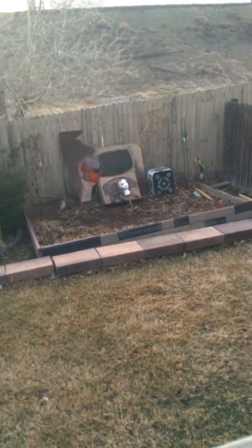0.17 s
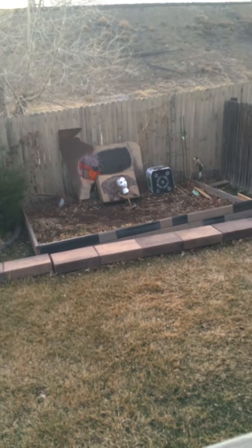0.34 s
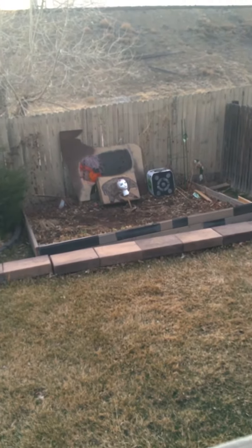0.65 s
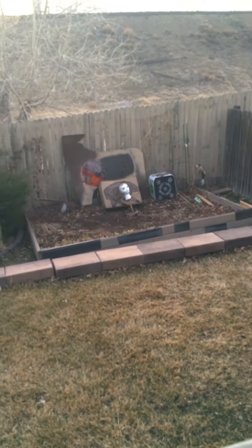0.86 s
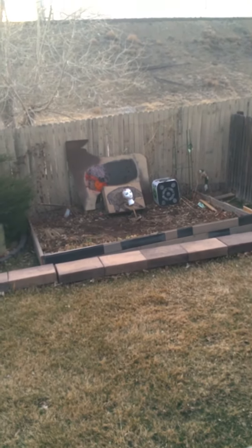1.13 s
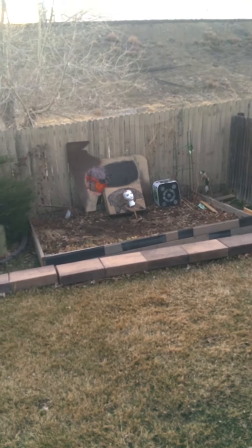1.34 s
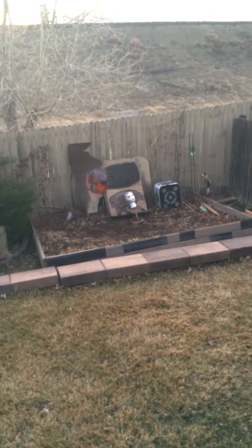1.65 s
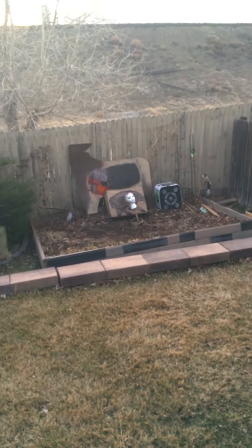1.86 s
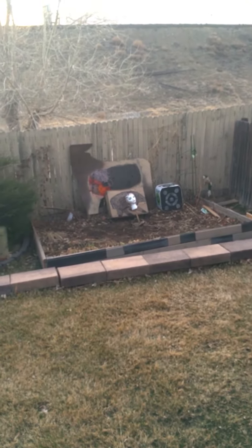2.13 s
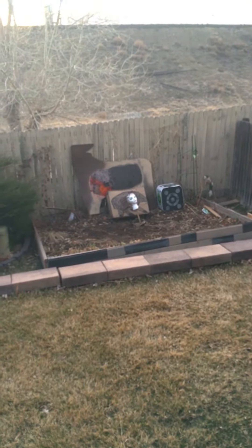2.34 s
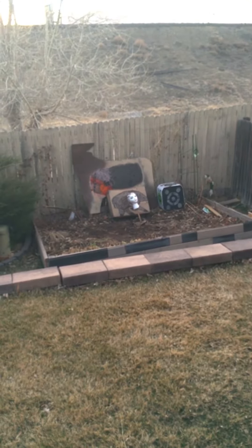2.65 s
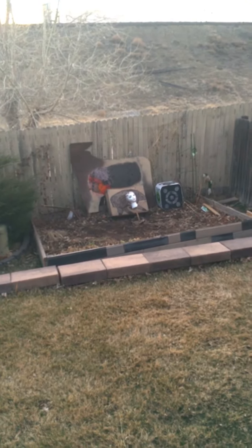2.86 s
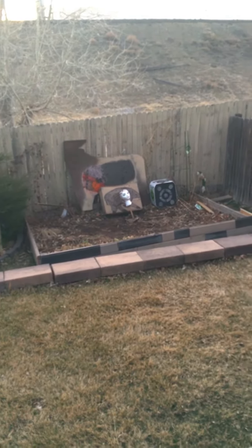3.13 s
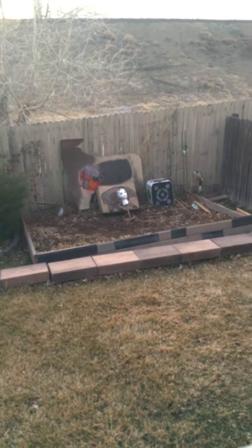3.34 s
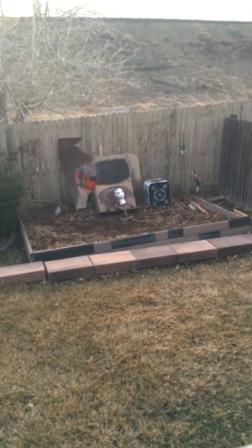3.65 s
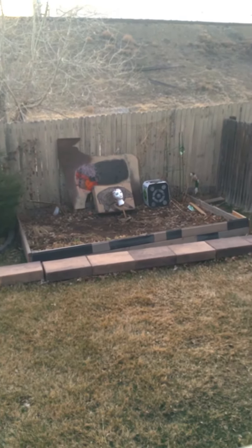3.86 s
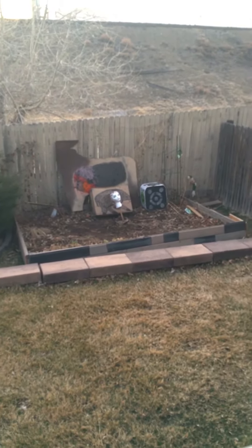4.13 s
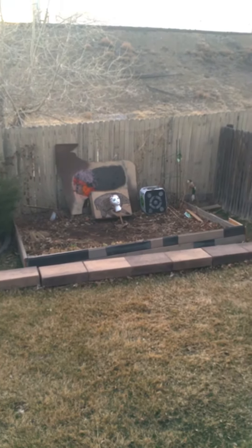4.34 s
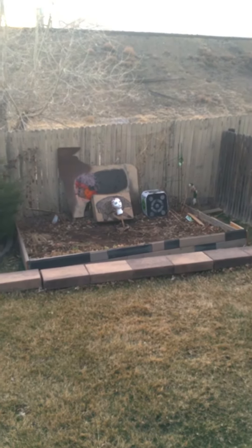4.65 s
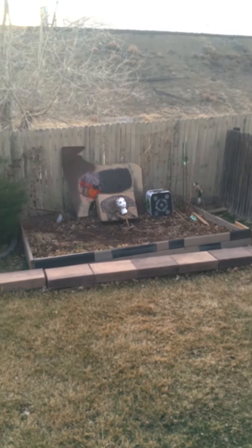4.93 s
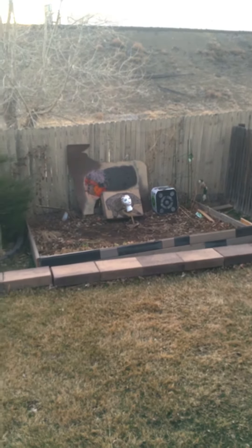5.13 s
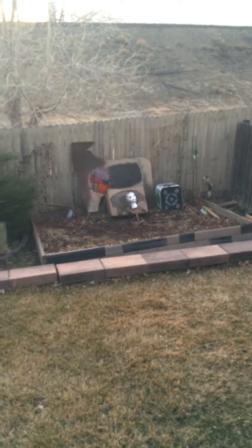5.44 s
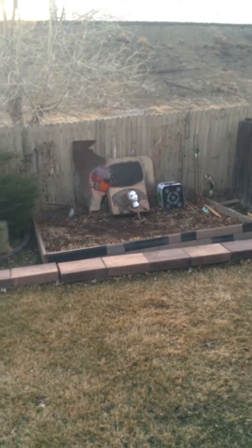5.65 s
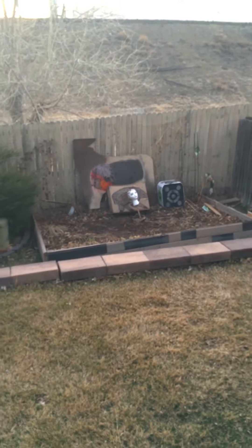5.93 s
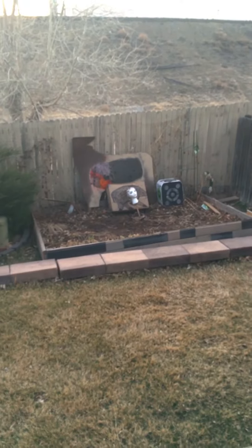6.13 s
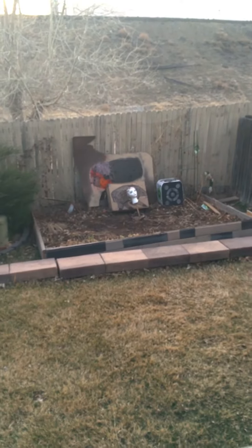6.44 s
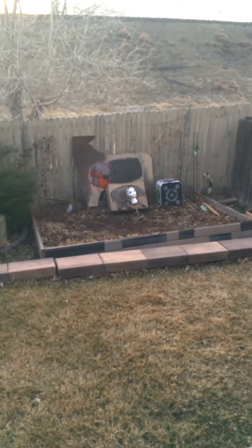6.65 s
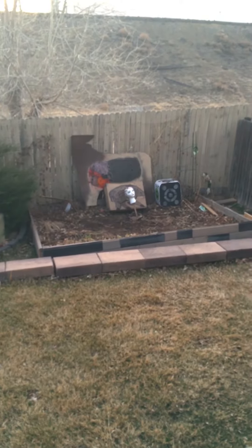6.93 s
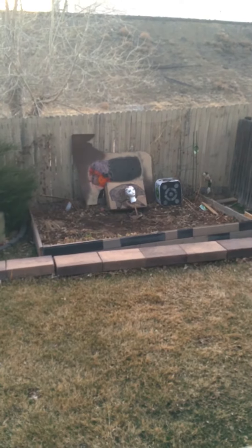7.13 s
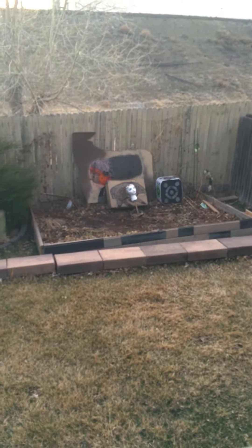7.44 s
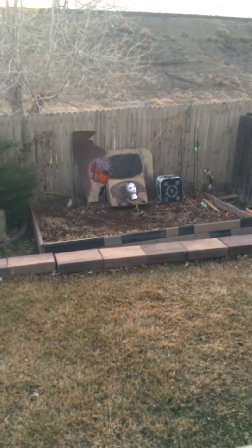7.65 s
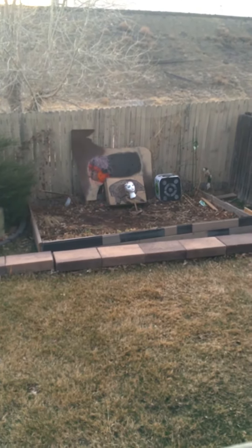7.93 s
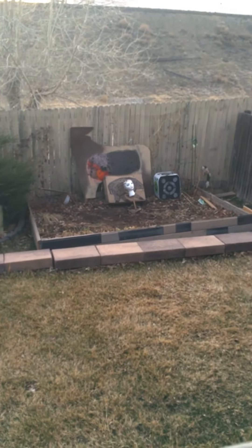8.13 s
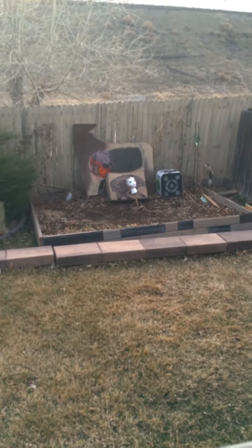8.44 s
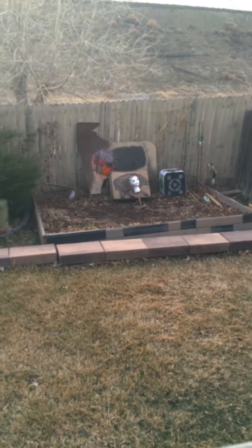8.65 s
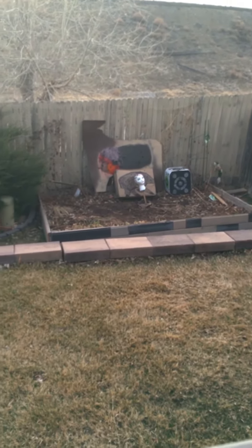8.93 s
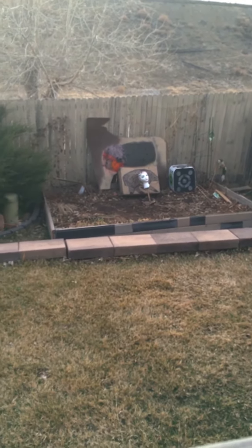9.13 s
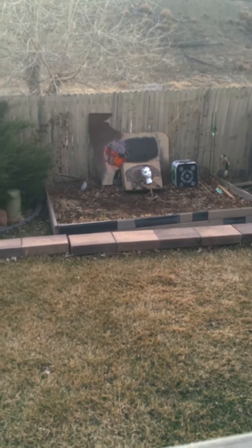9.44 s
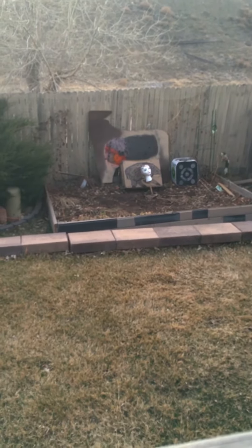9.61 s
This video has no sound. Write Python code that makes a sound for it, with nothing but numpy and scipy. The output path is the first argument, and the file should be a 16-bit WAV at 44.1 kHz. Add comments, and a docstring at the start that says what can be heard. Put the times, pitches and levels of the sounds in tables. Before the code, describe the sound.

Over low town hum, a bow twangs and its arrow cracks into a target; later, faint gear clicks and a far vehicle accelerating.

```python
"""A low town hum builds behind a back yard; then a bow snaps, its arrow hisses off and thuds into a target by a fence.
A hillside echoes the hit; afterwards a distant vehicle pulls through three gears while the archer's gear clicks.
Bow and target are struck modes with noise bursts; whistle, vanes and scrapes are narrow noise bands.
The exhaust is a sum of wavering orders; town, cloth and microphone hiss are coloured noise.
One microphone hears it all; the recorder's hiss gate holds the treble down until a loud, bright sound opens it."""
import sys
import numpy as np
from scipy import signal
from scipy.fft import rfft, irfft, next_fast_len
from scipy.io import wavfile
from scipy.ndimage import uniform_filter1d, map_coordinates

SR = 44100
rng = np.random.default_rng(int(sys.argv[2]) if len(sys.argv) > 2 else 0)


def dump_mix(stems):
    """Bounce the given channels to the path in sys.argv[1] as a 16-bit WAV at rate SR."""
    frames = np.atleast_2d(stems).T  # one column per channel
    limited = np.clip(frames, -1, 1)  # hard clip at full scale
    pcm = np.round(limited * 32767).astype(np.int16)
    wavfile.write(sys.argv[1], SR, pcm)


N = 431298  # length [samples]

# Far town rumble: (frequency [Hz], relative level per hertz [dB])
RUMBLE_SPECTRUM = [(20, -25.5), (32, -16.5), (45, -3.5), (62, 2), (85, -0.5), (130, -4), (200, -7.5),
                   (320, -8.5), (430, -22), (700, -31.5), (1500, -61.5)]
# Far tyre wash: (frequency [Hz], relative level per hertz [dB])
TYRE_SPECTRUM = [(150, -9), (400, 0), (650, -0.5), (900, 1.5), (1150, -6), (1500, -13.5), (2200, -20),
                 (4000, -30), (9000, -47)]
# Rise and fall of the tyre wash, before its common lift: (time [s], relative level [dB])
TYRE_LEVEL = [(0.0, -60), (3.46, -61), (5.34, -59.5), (5.58, -60), (6.29, -56.5), (7.11, -60), (7.65, -57),
              (9.78, -61)]
# Microphone hiss: (frequency [Hz], relative level per hertz [dB])
HISS_SPECTRUM = [(300, -10.5), (1500, 1.5), (3500, 3), (4900, -0.5), (6000, 0.5), (9500, -3), (10400, -7),
                 (11500, -4.5), (15500, -7.5)]
# Distant engine, one row a gear: (pull start [s], pull end [s], start rate [cycles/s], end rate [cycles/s])
GEAR_PULLS = [(2.4, 3.53, 24, 36.7), (3.75, 5.42, 24.8, 34.1), (5.68, 7.42, 26.3, 32.6)]
# Throttle in each gear: (level at the start [dB], time of the peak [s], level at the peak [dB])
THROTTLE = [(-45, 3.09, -41), (-45, 5.36, -38.5), (-44.5, 7.02, -36.5)]
# Uneven beat of the cylinders: (multiple of the cycle rate, relative level in first, second, third gear [dB])
EXHAUST_ORDERS = [(2, 13.5, 5.5, 8.5), (3, -3.5, -8.5, -2.5), (4, -5.5, -2, -1), (5, -1, -3.5, -7.5),
                  (6, -1.5, -2, -7), (7, 5.5, 1.5, -4.5), (8, -11, -12.5, -15.5), (9, 1, -1.5, -.5),
                  (10, -6.5, -8.5, -8.5), (11, -3, -2, -1), (12, -5, -4.5, -3.5), (13, -10, -11, -7),
                  (14, -7, -8.5, -6.5), (15, -13, -22, -18), (16, -7.5, -14, -11), (17, -26.5, -27.5, -24),
                  (18, -15.5, -17, -16.5), (19, -15.5, -16.5, -16), (21, -17.5, -16, -18),
                  (23, -21, -15.5, -20), (25, -24, -13.5, -17), (27, -22, -15.5, -16), (28, -23, -19, -16),
                  (30, -24, -14.5, -16.5), (32, -25, -18, -19), (34, -28, -21, -22)]
# Fixed colour laid on the exhaust orders, with peaks and dips: (frequency [Hz], gain [dB])
ENGINE_COLOUR = [(50, -9.5), (120, 3.0), (160, -1.0), (185, -1.0), (210, 1.0), (235, 5.0), (260, 0.5),
                 (285, 3.5), (310, 3.5), (335, -1.5), (365, 3.5), (395, -4.0), (430, -3.0), (480, -1.5),
                 (530, 2.5), (590, 5.0), (640, -10.0), (800, -2.0), (950, -4.5), (1150, -2.5)]
# Gas roar of the exhaust: (frequency [Hz], relative level per hertz [dB])
ROAR_SPECTRUM = [(40, -24), (110, -6.5), (250, 3.5), (370, 4), (460, -15), (570, 5.5), (680, -21.5),
                 (900, -9.5), (1200, -19.5), (2000, -32), (4000, -56)]
# Sleeve passes, before a common lift: (time of the peak [s], half-length [s], relative level [dB], treble shelf [dB])
SLEEVE_PASSES = [(3.434, 0.064, -73.5, 7.5), (4.961, 0.07, -70.5, 6), (5.147, 0.15, -73.5, -4.5),
                 (5.501, 0.15, -71, -2), (5.798, 0.18, -70.5, -5), (7.828, 0.074, -72.5, 11),
                 (8.367, 0.16, -70, -0.5), (8.6, 0.13, -75, -1), (8.802, 0.25, -76, -4)]
# Rubbing cloth: (frequency [Hz], relative level per hertz [dB])
CLOTH_SPECTRUM = [(600, -10), (1500, 1.5), (2400, 2.5), (3400, -0.5), (4600, -3.5), (6000, -3),
                  (9000, -9.5), (11000, -14.5), (16000, -31)]
# Gear scrapes, before a common lift: (time of the peak [s], half-length [s], relative level [dB], centre [Hz])
SCRAPE_EVENTS = [(5.048, .016, -64, 3350), (5.1, 0.0088, -63, 3200), (5.131, 0.0072, -57, 1370),
                 (5.18, 0.011, -60.5, 1370), (5.185, .02, -68, 3240), (5.195, .025, -69, 4070),
                 (5.23, .007, -67, 3090), (5.467, 0.016, -61.5, 3500), (5.475, .025, -67, 4150)]
# Small gear clicks: (time [s], snap level [dB], treble shelf [dB], tail t60 [s], ring centre [Hz], ring level [dB])
CLICK_EVENTS = [(2.529, -53, 17, 0.32, 4200, -53), (2.569, -56, 14, 0.12, 4230, -54),
                (3.896, -49.5, -7, 0.12, 1570, -51), (4.388, -49.5, 1, 0.14, 2050, -52),
                (4.412, -52, -2, 0.19, 2210, -52), (4.755, -49.5, 11, 0.04, 3870, -46.5),
                (5.124, -51, -2, .11, 3080, -52), (5.167, -55, 15, .14, 3300, -57),
                (5.372, -59, -4, .04, 3260, -52), (5.38, -48.5, -4, 0.089, 3000, -47),
                (5.448, -60, 22, 0.19, 4750, -60), (5.915, -48, 0, 0.11, 2840, -44),
                (6.183, -46, -1, 0.13, 1950, -49), (6.852, -55.5, 6, 0.13, 3200, -58),
                (8.0036, -46.5, 0.5, 0.098, 3480, -43), (8.109, -58, 18, .04, 5400, -52),
                (8.1225, -44, 18.5, 0.21, 3300, -46), (8.294, -51, 0, .1, 2200, -54),
                (9.101, -51, -11, 0.13, 3200, -54), (9.5644, -46.5, -3, 0.11, 2980, -43)]
# Snap of a click: (frequency [Hz], relative level per hertz [dB])
CLICK_SPECTRUM = [(300, 12), (900, 6.5), (1400, 4.5), (1900, 2), (3400, 2.5), (5000, -6.5), (8000, -16),
                  (12000, -24), (16000, -37)]
# Soft bumps of the hand: (time [s], level [dB])
BUMP_EVENTS = [(4.155, -32.5), (4.408, -29.5), (4.679, -34.5), (6.178, -30.5), (8.003, -30), (8.156, -35),
               (8.29, -38.5), (9.565, -33.5)]
# Body of a bump: (frequency [Hz], relative level per hertz [dB])
BUMP_SPECTRUM = [(25, -44), (40, -29), (60, 7.5), (130, 6), (220, -0.5), (400, -11), (1000, -26.5),
                 (3000, -55)]
# Rough ring of the gear with a thin jingle on top: (centre [Hz], half-width [Hz], relative level [dB], t60 [s])
GEAR_RING = [(984, 56, -15, 0.18), (1230, 140, -14, 0.13), (1850, 100, -6, 0.16), (2090, 130, -6, 0.13),
             (2350, 160, -13, 0.22), (2730, 200, -11.5, 0.23), (3295, 220, -10.5, 0.2),
             (3970, 90, -19, 0.36), (8140, 200, -24, .13), (9200, 60, -26, .13), (9800, 60, -27, .13)]
# Bow contacts, string let go and string on its stop: (time [s], level [dB])
RELEASE = [(1.2126, -28), (1.2206, -32.5)]
# Limbs, string and riser: (frequency [Hz], relative level [dB], t60 [s])
BOW_MODES = [(238, -20, 0.22), (388.6, -16, 0.18), (1020, -15, 0.091), (2070, -14.5, 0.11),
             (2440, -19.5, .15), (3430, -17, 0.13), (4060, -24, 0.075), (5600, -19, .06)]
# Snap of the string: (frequency [Hz], relative level per hertz [dB])
SNAP_SPECTRUM = [(200, -17.5), (600, 2), (1100, 0.5), (2200, -1), (4000, -3.5), (6000, -3), (8000, -9.5),
                 (12000, -13.5), (16000, -14)]
# Ticks of loose fittings as the bow settles: (time [s], level [dB], centre [Hz])
FITTING_TICKS = [(1.2765, -44, 10000), (1.3188, -42.5, 10010), (1.329, -39.5, 6200)]
# Point going in, then shaft stopped: (time [s], crack level [dB], treble shelf [dB], shaft level [dB], body level [dB])
STRIKES = [(1.4537, -17.5, 2, -11.5, -17.5), (1.46, -14.5, -6.5, -20, -37)]
# Crack of the target face: (frequency [Hz], relative level per hertz [dB])
CRACK_SPECTRUM = [(300, -2.5), (1200, -1.5), (1750, 1), (2600, -8), (3600, -4.5), (4600, -6), (6000, -17),
                  (8000, -16.5), (10000, -15.5), (13000, -16), (16000, -20)]
# Stiff arrow shaft: (frequency [Hz], relative level [dB], t60 [s])
SHAFT_MODES = [(1490, 4.5, 0.004), (3422, -1, 0.0098), (4430, -3.5, 0.0092), (9664, -6, 0.0064),
               (11900, -11.5, 0.005), (13900, -13.5, .004)]
# Target and its backing: (frequency [Hz], relative level [dB], t60 [s])
TARGET_MODES = [(57, -9, .3), (98, -14, .14), (161, -16, .14), (182.9, -14.5, .14), (214, -15, 0.22),
                (351, -11.5, .12), (388, -11.5, .1), (490, -10, .14), (611.6, -17, 0.091), (758, -20, .16),
                (805, -15, 0.24), (873, -19.5, .15), (985, -18, 0.092), (1135, -9.5, .06), (1260, -10, .06),
                (1416, -10, 0.088), (1530, -9, 0.06), (1710, -12, 0.067), (1790, -14, .05),
                (1978, -15.5, 0.08), (2114, -19, .08), (3310, -25.5, .1)]
# Strength of the bending wave as its pitch falls: (frequency [Hz], relative level [dB])
BEND_STRENGTH = [(60, -24), (110, -8.5), (170, 1), (280, -4), (420, 4), (750, 1), (1050, -.5), (1500, 4.5)]
# Decay of the yard's scatter: (frequency [Hz], t60 [s])
YARD_DECAY = [(100, 0.17), (500, 0.18), (1500, 0.16), (2500, 0.21), (4000, 0.18), (7000, .19), (14000, .16)]
# What air and slope leave of the echo: (frequency [Hz], relative level per hertz [dB])
HILL_SPECTRUM = [(300, -6), (1100, -10), (1800, -6), (2800, 0), (4400, -7), (6000, -12), (10000, -30)]

# The town's rumble starts BUILD_DB down and grows for BUILD_S
RUMBLE_DB, BUILD_DB, BUILD_S = -42.5, 3, 4.1
# Engine rates [cycles/s] before and after the pulls; times [s] of a gear shift and of spinning up or down
IDLE_RATE, COAST_RATE, CLUTCH_S, SPIN_S = 22.5, 27, .08, .3
# Each pull eases before the shift; off the throttle it drops, and outside the pulls it is barely heard
EASE_DB, LIFTED_DB, LIFT_S, APPROACH_S, FAR_DB = 4, -46.5, 0.12, 1.1, -60.5
# A loose part: first strike, time between strikes, loss at each
CLACK_S, CLACK_DB, RATTLE_S, RATTLE_LOSS_DB = 8.1229, -35.5, 0.019, 9
# Hard knock of the first strike
KNOCK_DB, KNOCK_HZ, KNOCK_T60_S = -33, 1910, 0.038
# Arrow in flight: starting levels, fade as it flies off, time constant of the launch
WHISTLE_DB, WHISTLE_FADE_DB_PER_S = -56, 61.5
VANES_DB, VANES_FADE_DB_PER_S, LAUNCH_S = -56.5, 62, .008
# The whistle glides up and flares briefly near the top
WHISTLE_START_HZ, WHISTLE_TOP_HZ, GLIDE_S = 1700, 4000, .056
FLARE_AFTER_S, FLARE_LENGTH_S, FLARE_DB = .047, .017, 10.5
# Low bending waves cross the target slowly: lag scale, and the frequency that arrives at once
BEND_LAG_S, PROMPT_HZ = .0053, 1850
# Dense scatter of the crack off fence and ground
SCATTER_DB, SCATTER_RISE_S, SCATTER_T60_S, SCATTER_TREBLE_DB = -27, 0.002998, 0.21, -3
# Echo from the hillside beyond the fence
HILL_S, HILL_DB, HILL_RISE_S, HILL_T60_S = .458, -33, 0.018, 0.93
# Band limits of the recorder
BASS_HZ, TOP_HZ = 32, 15900


def amp(db):
    """Decibels to gain."""
    return 10 ** (np.asarray(db) / 20)


def unit(x):
    """Scale to rms 1."""
    return x / np.sqrt(np.mean(x ** 2) + 1e-20)


def along(points, hz):
    """(frequency [Hz], value) points read on a log frequency axis."""
    f, v = np.transpose(points)
    return np.interp(np.log(hz + 1), np.log(f + 1), v)


def curves(rows):
    """One value per sample for each column after the time."""
    s, *cols = np.transpose(rows)
    return [np.interp(np.arange(N) / SR, s, c) for c in cols]


def wobble(rate):
    """A smooth random curve, rate knots a second."""
    knots = rng.standard_normal(int(N * rate / SR) + 4)
    coarse = np.arange(0, N, 64)
    return np.interp(np.arange(N), coarse, map_coordinates(knots, [coarse * rate / SR]))


def filtered(x, response):
    """x shaped by a gain that is a function of frequency."""
    m = next_fast_len(len(x) + 8192)
    spectrum = rfft(x, m) * response(np.fft.rfftfreq(m, 1 / SR))
    return irfft(spectrum, m)[:len(x)]


def noise(spectrum, size, treble_db=0):
    """Coloured noise of rms 1, with a shelf on its treble."""
    shelf = [(4000, 0), (7000, treble_db)]
    white = rng.standard_normal(size)
    return unit(filtered(white, lambda hz: amp(along(spectrum, hz) + along(shelf, hz))))


def narrow(hz, width_hz, size):
    """A band of noise of rms 1 round a fixed or moving centre."""
    slow = filtered(rng.standard_normal(size), lambda f: 1 / (1 + (f / width_hz) ** 2))
    carrier = np.cos(2 * np.pi * np.cumsum(hz * np.ones(size)) / SR)
    return unit(slow * carrier)


def fade(t60, rise):
    """Half a second of a quick rise and an exponential decay."""
    t = np.arange(SR // 2) / SR
    return np.exp(-np.log(1000) * t / t60) * (1 - np.exp(-t / rise))


def ring(modes, rise_cycles, scatter_db):
    """Struck modes build up over a set number of cycles, so the bass comes last."""
    t = np.arange(SR // 2) / SR
    out = np.zeros(len(t))
    for k, (hz, db, t60) in enumerate(modes):
        gain = (-1) ** k * amp(db + scatter_db * rng.standard_normal())
        out += gain * fade(t60, rise_cycles / hz) * np.sin(2 * np.pi * hz * t)
    return out


def add(track, s, sound):
    """Mix a sound into the track at time s."""
    part = track[round(s * SR):][:len(sound)]
    part += sound[:len(part)]


def town():
    """Far traffic: an uneven rumble under a smoother wash of tyres."""
    build_db, = curves([(0, -BUILD_DB), (BUILD_S, 0)])
    tyres_db, = curves(TYRE_LEVEL)
    rumble = amp(RUMBLE_DB + build_db + 0.99 * wobble(11)) * noise(RUMBLE_SPECTRUM, N)
    tyres = amp(tyres_db + 3.5 + 1.1 * wobble(8)) * noise(TYRE_SPECTRUM, N)
    return rumble + tyres


def microphone_hiss():
    """Steady coloured noise of the microphone itself."""
    return amp(-64.0) * noise(HISS_SPECTRUM, N)


def driving():
    """Engine rate and level: both rise through each gear and fall at the shift."""
    first, last = GEAR_PULLS[0][0], GEAR_PULLS[-1][1]
    speed = [(first - SPIN_S, IDLE_RATE)]
    level = [(first - APPROACH_S, FAR_DB)]
    for (start, end, low, high), (start_db, peak_s, peak_db) in zip(GEAR_PULLS, THROTTLE):
        speed += [(start, low), (end, high), (end + CLUTCH_S, high)]
        level += [(start, start_db), (peak_s, peak_db)]
        level += [(end, peak_db - EASE_DB), (end + LIFT_S, LIFTED_DB)]
    speed.append((last + SPIN_S, COAST_RATE))
    level.append((last + SPIN_S, FAR_DB))
    return curves(speed) + curves(level)


def vehicle():
    """An uneven exhaust beat climbs through a fixed colour of peaks and dips; the air makes every order waver."""
    cycle_hz, level_db = driving()
    waver_db, roar_share, smear_radians, chuff_db, unsteady = 1.5, .17, .8, 3.5, .0008
    turn = 2 * np.pi * np.cumsum(cycle_hz * (1 + unsteady * wobble(12))) / SR
    t = np.arange(N) / SR
    pull_s = np.ravel([gear[:2] for gear in GEAR_PULLS])
    beat = np.zeros(N)
    for order, *gear_db in EXHAUST_ORDERS:
        order_db = np.interp(t, pull_s, np.repeat(gear_db, 2))
        order_db = order_db + along(ENGINE_COLOUR, order * cycle_hz) + waver_db * wobble(5)
        # the orders stay roughly in step, so one chuff stands out in every cycle
        beat += amp(order_db) * np.cos(order * turn + rng.normal(0, smear_radians))
    # gas noise comes with each chuff
    roar = unit(noise(ROAR_SPECTRUM, N) * amp(chuff_db * np.cos(turn)))
    return amp(level_db) * (unit(beat) + roar_share * roar)


def sleeve():
    """Short, scratchy swells of cloth as the archer moves."""
    out, t = np.zeros(N), np.arange(SR) / SR - .5
    for s, length, db, treble_db in SLEEVE_PASSES:
        swell = np.exp(-(t / length) ** 2)
        add(out, s - .5, amp(db + 9.5) * noise(CLOTH_SPECTRUM, SR, treble_db) * swell)
    return out * amp(1.8 * wobble(70))


def scrapes():
    """Hard parts rub over each other in short, chirpy swells of rough level, as they stick and slip."""
    out, t = np.zeros(N), np.arange(SR) / SR - .5
    for s, length, db, hz in SCRAPE_EVENTS:
        rub = unit(narrow(hz, width_hz=230, size=SR) + amp(-6) * noise(CLOTH_SPECTRUM, SR))
        add(out, s - .5, amp(db + 3.0) * rub / (1 + (t / length) ** 2))
    return out * amp(1.6 * wobble(160))


def bumps():
    """The hand bumps softly against the gear: bursts of low noise."""
    out = np.zeros(N)
    for s, db in BUMP_EVENTS:
        add(out, s, amp(db) * noise(BUMP_SPECTRUM, SR // 2) * fade(t60=0.29, rise=0.0023))
    return out


def clicks():
    """Gear clicks: a snap, a brief hard ring at the struck part's own pitch, and a short tail."""
    out, size = np.zeros(N), SR // 2
    for s, db, treble_db, t60, ring_hz, ring_db in CLICK_EVENTS:
        shape = amp(-1.0) * fade(t60=0.018, rise=0.0004) + amp(1.0) * fade(t60, rise=0.0013)
        snap = amp(db) * noise(CLICK_SPECTRUM, size, treble_db) * shape
        tick = narrow(ring_hz, width_hz=230, size=size) * fade(t60=0.041, rise=0.0011)
        add(out, s, snap + amp(ring_db) * tick)
    return out


def rattle(count):
    """A loose part knocks hard, bounces ever more weakly, and rings the gear."""
    out = np.zeros(N)
    knock = ring([(KNOCK_HZ, 0, KNOCK_T60_S)], rise_cycles=1.5, scatter_db=-2.0)
    add(out, CLACK_S, amp(KNOCK_DB) * knock)
    for k in range(count):
        clack = np.zeros(SR // 2)
        for hz, width_hz, db, t60 in GEAR_RING:
            clack += amp(db) * narrow(hz, width_hz, SR // 2) * fade(t60, rise=0.00063)
        add(out, CLACK_S + k * RATTLE_S, amp(CLACK_DB - k * RATTLE_LOSS_DB) * clack)
    return out


def yard(x, wet_db, treble_db, rise):
    """x with its scatter from fence, house and ground: noise decaying at its own rate in each band."""
    hz, t, z = signal.stft(rng.standard_normal(SR // 2), SR, nperseg=256)
    colour = amp(along([(4500, 0.00061), (7000, treble_db)], hz))[:, None]
    decay = np.exp(-np.log(1000) * t / along(YARD_DECAY, hz)[:, None])
    tail = signal.istft(z * decay * colour, SR, nperseg=256)[1]
    tail = tail * (1 - np.exp(-np.arange(len(tail)) / SR / rise))
    return x + amp(wet_db) * signal.fftconvolve(x, tail / np.linalg.norm(tail))[:N]


def hillside(x):
    """The scrubby slope returns x about half a second later, thin and smeared."""
    out = np.zeros(N)
    slope = noise(HILL_SPECTRUM, SR // 2) * fade(HILL_T60_S, HILL_RISE_S)
    add(out, HILL_S, amp(HILL_DB) * signal.fftconvolve(x, slope / np.linalg.norm(slope)))
    return out


def bow():
    """The string whips forward onto its stop; limbs ring and fittings tick."""
    out = np.zeros(N)
    for s, db in RELEASE:
        shape = fade(t60=0.036, rise=.001) + amp(-16.5) * fade(t60=0.27, rise=.004)
        whip = noise(SNAP_SPECTRUM, SR // 2) * shape
        limbs = ring(BOW_MODES, rise_cycles=1, scatter_db=1)
        add(out, s, amp(db) * (whip + limbs))
    for s, db, hz in FITTING_TICKS:
        tick = narrow(hz, width_hz=1700, size=SR // 2) * fade(t60=.01, rise=.0004)
        add(out, s, amp(db) * tick)
    return yard(out, wet_db=-13.5, treble_db=-3.0, rise=.006)


def arrow_flight():
    """Air whistles round the shaft and hisses in the vanes as the arrow leaves."""
    t = np.arange(N) / SR
    age = np.maximum(t - RELEASE[-1][0], 0)
    flying = (1 - np.exp(-age / LAUNCH_S)) * (t < STRIKES[0][0])
    hz = np.interp(age, [0, GLIDE_S], [WHISTLE_START_HZ, WHISTLE_TOP_HZ])
    flare = np.exp(-((age - FLARE_AFTER_S) / FLARE_LENGTH_S) ** 2)
    whistle_db = WHISTLE_DB - WHISTLE_FADE_DB_PER_S * age + FLARE_DB * flare
    octave = amp(-5.5) * narrow(2 * hz, width_hz=1800, size=N)
    whistle = amp(whistle_db) * (narrow(hz, width_hz=950, size=N) + octave)
    vanes = amp(VANES_DB - VANES_FADE_DB_PER_S * age) * narrow(9100, width_hz=1000, size=N)
    return flying * (whistle + vanes) * amp(2.2 * wobble(270))


def thud():
    """A bending wave arrives treble first, so the knock drops into a thump and wakes the target's modes."""
    t = np.arange(SR) / SR
    falling_hz = PROMPT_HZ / (1 + t / BEND_LAG_S) ** 2
    # below the lowest listed frequency the wave dies away
    strength = amp(along(BEND_STRENGTH, falling_hz)) * np.minimum(falling_hz / BEND_STRENGTH[0][0], 1) ** 2
    out = strength * np.sin(2 * np.pi * np.cumsum(falling_hz) / SR)
    for k, (hz, db, t60) in enumerate(TARGET_MODES):
        lag = BEND_LAG_S * max(np.sqrt(PROMPT_HZ / hz) - 1, 0)
        add(out, lag, (-1) ** k * ring([(hz, db, t60)], rise_cycles=1.0, scatter_db=1.0))
    return out


def arrow_hit():
    """The point cracks through the face, the shaft clacks and the whole target thuds."""
    cracks, shaft, body = np.zeros((3, N))
    for s, crack_db, treble_db, shaft_db, body_db in STRIKES:
        crack = noise(CRACK_SPECTRUM, SR // 2, treble_db) * fade(t60=0.017, rise=0.00018)
        add(cracks, s, amp(crack_db) * crack)
        # the strike's treble setting also moves the shaft's highest modes
        modes = [(hz, db + treble_db * (hz > 7000), t60) for hz, db, t60 in SHAFT_MODES]
        add(shaft, s, amp(shaft_db) * ring(modes, rise_cycles=0.32, scatter_db=0.5))
        add(body, s, amp(body_db) * thud())
    scatter = noise(CRACK_SPECTRUM, SR // 2, SCATTER_TREBLE_DB) * fade(SCATTER_T60_S, SCATTER_RISE_S)
    add(cracks, STRIKES[0][0], amp(SCATTER_DB) * scatter)
    hit = shaft + cracks + yard(body, wet_db=-15.0, treble_db=-7.5, rise=0.0065)
    return hit + hillside(hit)


def scene():
    """All sources at one microphone, with its own hiss."""
    background = town() + microphone_hiss() + vehicle()
    handling = sleeve() + scrapes() + bumps() + clicks() + rattle(count=3)
    shot = bow() + arrow_flight() + arrow_hit()
    return (background + handling + shot)[None]


def hiss_gate(x, threshold_db, hold, shut_db):
    """The treble is turned down except around and just after a loud, bright sound."""
    bright = filtered(x, lambda hz: hz > 5500)
    loud = uniform_filter1d(bright ** 2, size=256) > amp(threshold_db) ** 2
    # the gate opens slightly ahead of the sound and is held after it
    ahead, held = round(0.013 * SR), round(hold * SR)
    is_open = signal.fftconvolve(loud * 1., np.ones(ahead + held))[ahead:ahead + N] > .5
    shut_curve = [(900, 0.0056), (1600, shut_db / 3), (2800, shut_db)]
    shut = filtered(x, lambda hz: amp(along(shut_curve, hz)))
    return shut + uniform_filter1d(is_open * 1., size=200) * (x - shut)


def record(dry):
    """Hiss gate, then the recorder's band limits."""
    gated = hiss_gate(dry[0], threshold_db=-41, hold=.388, shut_db=-12)
    bass_cut = signal.butter(2, BASS_HZ, "high", fs=SR, output="sos")
    thinned = signal.sosfilt(bass_cut, gated)
    return filtered(thinned, lambda hz: hz < TOP_HZ)[None]


dry = scene()
out = record(dry)
dump_mix(out)
```